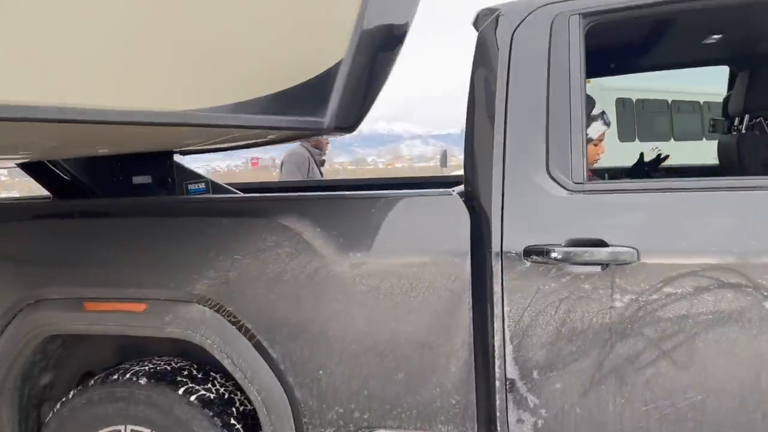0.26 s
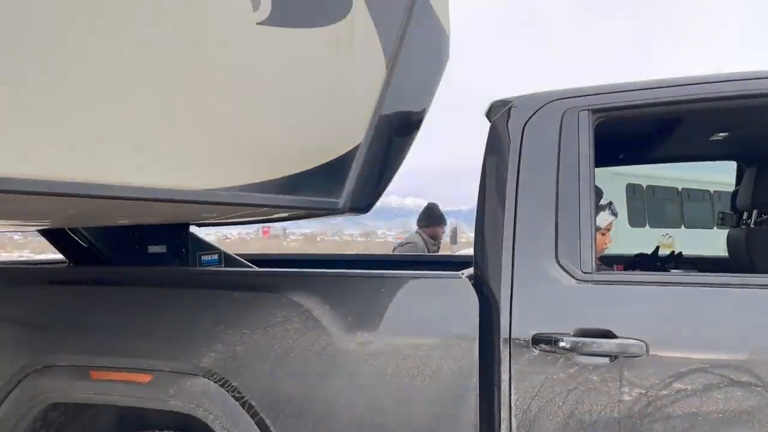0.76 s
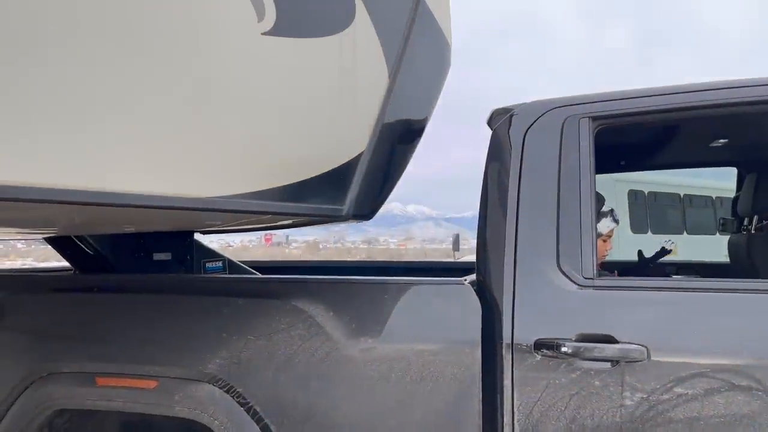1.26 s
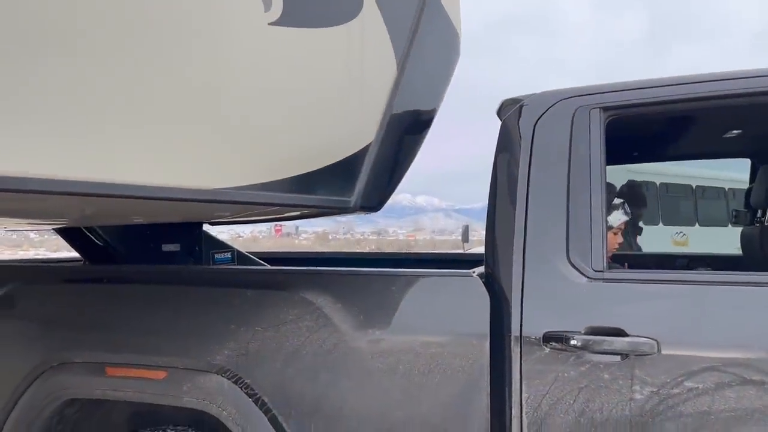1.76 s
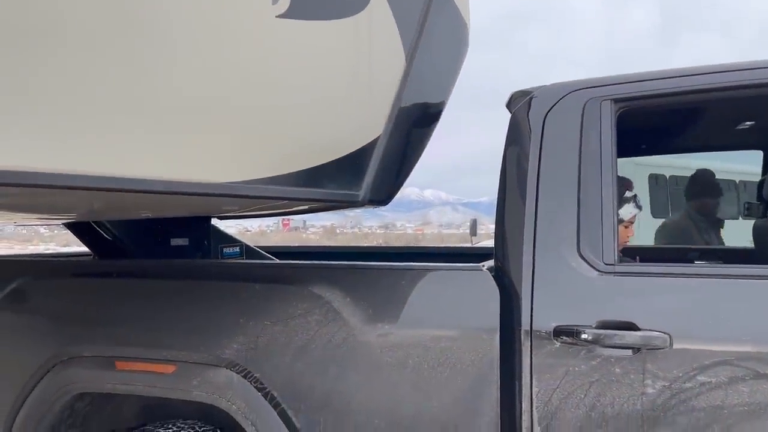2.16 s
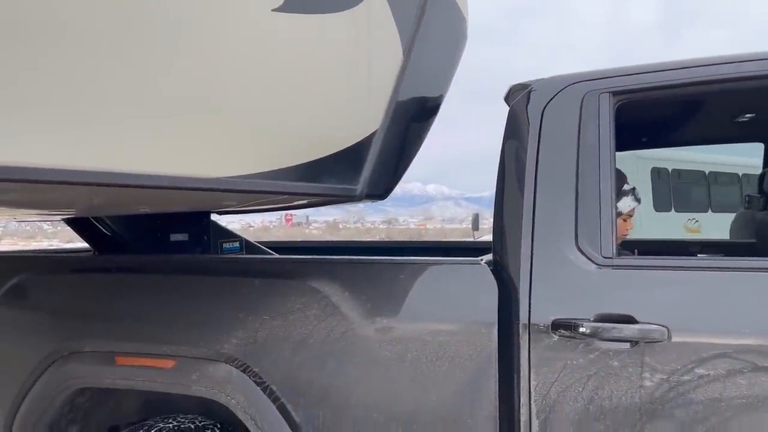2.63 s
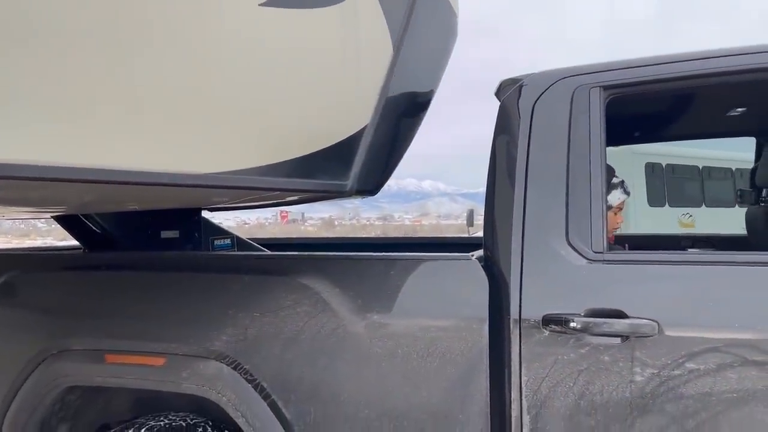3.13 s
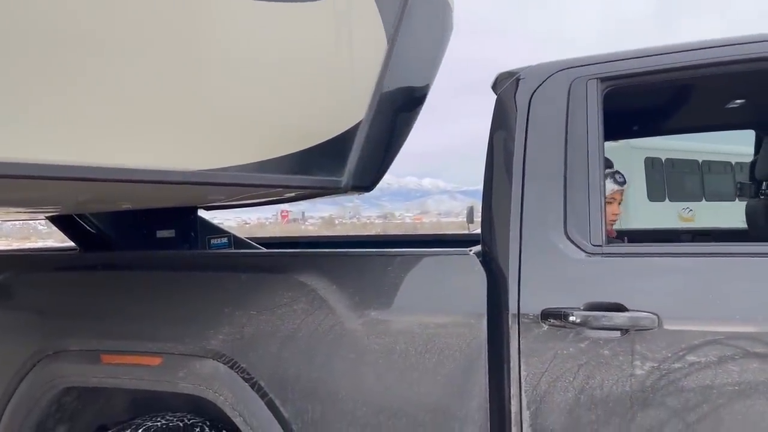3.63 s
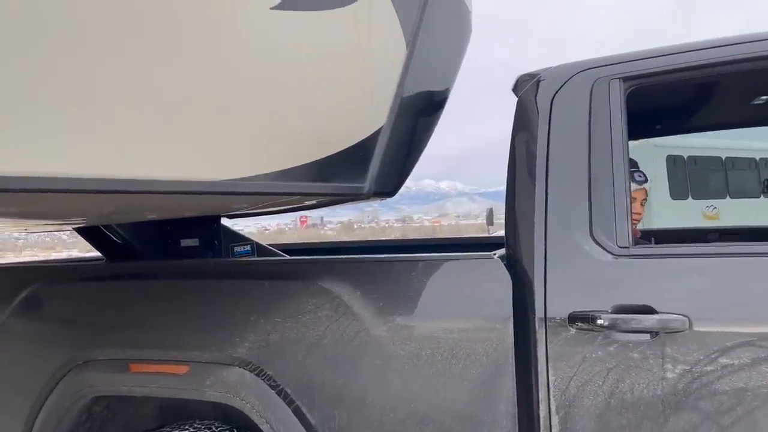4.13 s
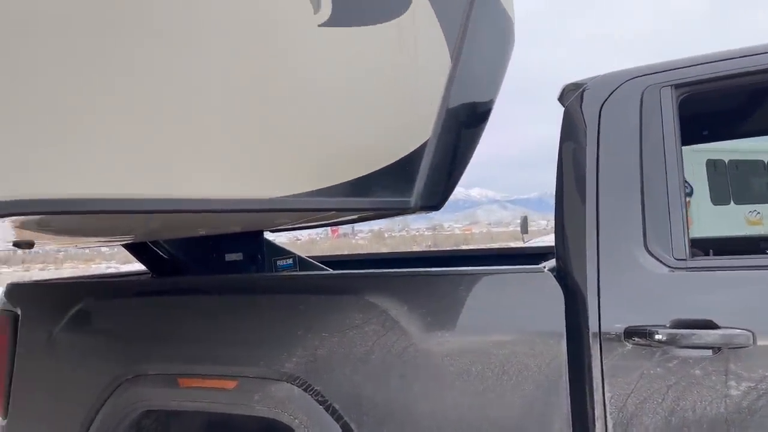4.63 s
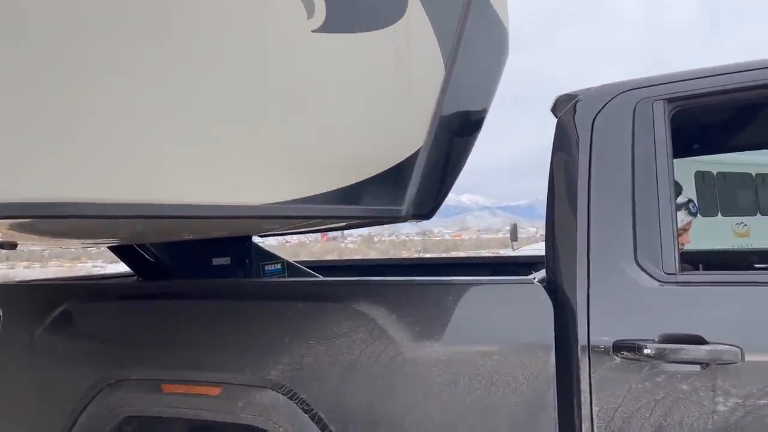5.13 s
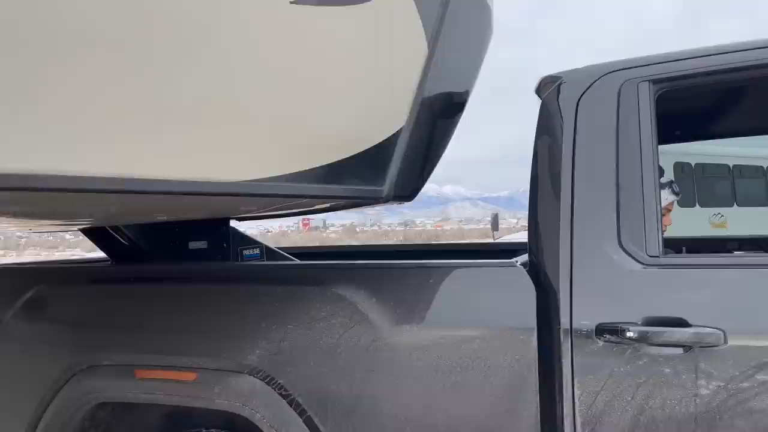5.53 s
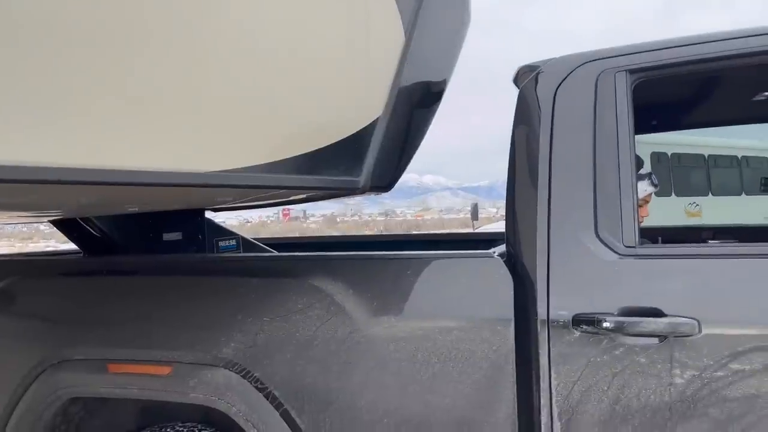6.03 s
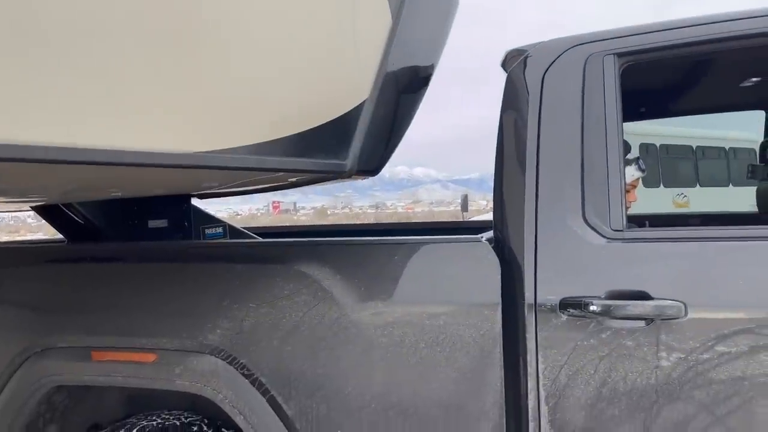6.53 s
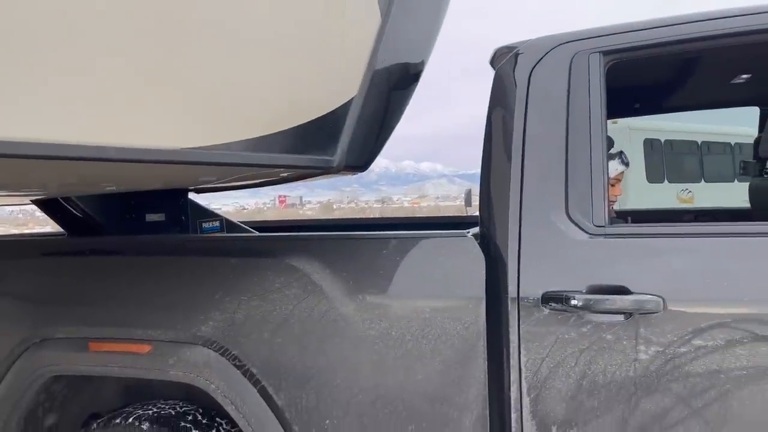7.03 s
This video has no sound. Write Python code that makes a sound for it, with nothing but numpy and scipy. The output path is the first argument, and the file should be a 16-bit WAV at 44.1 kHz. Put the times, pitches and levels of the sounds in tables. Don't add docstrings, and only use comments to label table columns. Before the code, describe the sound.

A close outdoor stereo pickup of a heavy diesel truck creeping slowly with a trailer. Throughout, a steady low exhaust drone pulses about forty times a second under dense, slightly loping injector clatter and metallic ticking; a faint airy turbo whistle sits above. The bed hums deep in uneven spells, with soft low body booms. Light knocks come from the hitch around 3.2 and 3.75 s. At 4.2 s a hard metallic clunk rings plate and panels, with a low thud and shudder; at 4.9 s comes the sharpest clank, and at 5.25 s a duller, heavier thump. A small bump follows at 5.6 s. Tyres scrub grit and dust faintly, most around 4 s. From about 6 s a heat shield buzz strengthens and engine speed dips slightly after 6.5 s. At 7.13 s a stone snaps in a quick bright crackle, and the engine still runs at the end, about 7.3 s.

```python
import sys
import numpy as np
from scipy import signal
from scipy.fft import rfft, irfft, next_fast_len
from scipy.io import wavfile
from scipy.ndimage import map_coordinates

SR = 44100
rng = np.random.default_rng(int(sys.argv[2]) if len(sys.argv) > 2 else 0)


def gain_from_db(level_db):
    decades = np.asarray(level_db, float) / 20
    return 10 ** decades


def wrap_up_sound(samples):
    columns = np.atleast_2d(samples).T
    tamed = np.clip(columns, -1, 1)
    steps = np.round(tamed * 32767).astype(np.int16)
    wavfile.write(sys.argv[1], SR, steps)


N = 321048
T = np.arange(N) / SR

# (time [s], firing rate [1/s])
FIRING_RATE = [(0, 39.96), (2, 39.95), (3, 39.93), (4, 40.0), (6.45, 39.97), (6.6, 39.1), (7.28, 38.9)]
# (multiple of the four-stroke cycle [-], level [dB rms])
EXHAUST_TONES = [(8, -48), (9, -61), (10, -60), (11, -55), (14, -56), (16, -56), (17, -62), (19, -49),
                 (21, -58), (22, -56), (24, -48), (25, -60), (26, -62), (40, -61), (77, -66), (80, -55.5),
                 (88, -68)]
# (place in cycle [0-1], pitch [Hz], peak [dB], t60 [s])
VALVE_THUMPS = [(.68, 253, -24, 0.04), (.765, 193, -27.5, 0.044), (0.96, 243, -28, 0.04),
                (0.4, 248, -39, 0.023)]
CYLINDER_KNOCK = [4, 1.5, 4, 2.9, 3.3, 4, -0.5, 3.8]
# (frequency [Hz], density [dB per Hz])
BAY_NOISE = [(250, -2.5), (500, -5), (700, -1.5), (1000, -0.5), (1400, 0), (2000, -7.5), (2700, -10.5),
             (3300, -13), (4200, -23.5), (7200, -34.5), (8100, -34), (9500, -28), (13800, -31.5),
             (14600, -26)]
# (frequency [Hz], width [Hz], lift [dB])
BLOCK_MODES = [(520, 70, -5), (820, 40, 4), (975, 45, 6), (1058, 35, 6), (1150, 50, -4), (1260, 40, 6),
               (1404, 40, 6), (1614, 50, 5.5), (1764, 60, 4), (1950, 55, 3), (2434, 75, 3), (2700, 120, 3),
               (3936, 70, 5), (5743, 60, 5)]
SMALL_PARTS = [823, 968, 1059, 1280, 1416, 1620, 1960, 2410, 2760, 3950, 4360, 4720, 5740]
# (start [s], end [s], pitch [Hz], level [dB rms])
BED_SPELLS = [(0, 0.505, 65.85, -44), (.5, 1.077, 65.2, -41), (1.35, 1.72, 63.5, -45),
              (1.78, 2.013, 65.95, -48), (2.025, 2.217, 67.8, -42), (2.28, 2.493, 68.3, -39),
              (2.627, 2.75, 62.9, -41.5), (2.81, 2.962, 62.7, -43.5), (3.095, 3.255, 60.4, -43.5),
              (3.312, 3.42, 62.6, -41.5), (3.53, 3.64, 64.3, -41), (3.73, 3.865, 61, -41),
              (3.95, 4.525, 60.67, -41.5), (4.595, 4.855, 63.7, -44), (5.45, 5.74, 60.6, -37.5),
              (5.79, 6.456, 60.7, -39.5), (6.519, 6.733, 61.3, -39), (6.78, 7.204, 63.7, -44)]
# (frequency [Hz], width [Hz], level [dB])
CAVITIES = [(46, 24, 2.5), (65, 45, -2.5), (105, 24, -4), (259, 76, -10.5), (423, 71, -19.5)]
# (middle [s], boom level [dB])
BODY_ROCKS = [(.3, -48.5), (1.4, -45.5), (1.95, -50), (3.3, -45.5), (4.7, -52), (5.28, -44.5), (6.26, -56),
              (7.18, -42)]

# (time [s], force [dB], sharpness added to small panels [dB], pitch factor of loaded big
# panels [-], weight that goes into the heaviest panels instead of the frame [dB])
HITCH_BLOWS = [
    (4.167, -19, 0, 0.92, -4.5),
    (4.884, -20, 2.5, 1.08, 1.5),
    (5.25, -26, -14, 0.967, 3.5),
]
# (pitch [Hz], peak over the force [dB], delay [s], swell time [s])
BED_PANELS = [(37.9, -9, 0.028, 0.066), (55.7, 5.5, 0.0369, 0.018), (103.3, 5, .012, .017),
              (210.7, 4.5, 0.0051, 0.0095), (288, -5, 0.00885, 0.0071), (952, 1.5, 0.0003, 0.005),
              (1183, -6, 0.00215, 0.0082), (1900, -17, 0.0028, 0.0125)]
# (frequency [Hz], width [Hz], level [dB])
PLATE_MODES = [(650, 190, -11), (972, 164, 5), (1247, 87, 5.5), (1464, 114, -0.5), (1920, 290, -6),
               (2670, 170, -15), (4000, 540, -27.5)]
# (frequency [Hz], density [dB per Hz])
FLOOR_THUD = [(60, -27), (150, 4), (300, 1), (600, -7.5), (1000, -3.5), (2500, -42)]
# (frequency [Hz], density [dB per Hz])
LOOSE_RATTLE = [(1500, 7.5), (3000, 4), (6000, -3), (13000, -24), (15000, -50)]
# (frequency [Hz], density [dB per Hz])
FRAME_SHUDDER = [(25, -32), (50, -3), (110, -0.5), (250, -11), (500, -32), (1500, -58)]
# (time [s], peak [dB], pitch [Hz], swell time [s])
SHORT_SWINGS = [(2.33, -51, 78, 0.038), (3.195, -27.5, 212, 0.0043), (3.305, -28.5, 70.5, 0.0045),
                (3.343, -44, 65, 0.0068), (3.749, -38, 198, 0.02), (3.809, -37.5, 214, 0.011),
                (4.167, -36.5, 4000, 0.0037), (4.169, -21, 330, 0.0081), (4.17, -20, 950, .011),
                (4.172, -37, 1984, 0.0085), (4.209, -20.5, 134, 0.013), (4.229, -21, 202, 0.0082),
                (4.36, -38, 105, 0.019), (4.411, -42, 57, 0.031), (4.886, -12.5, 1100, 0.0028),
                (4.884, -19.5, 1550, 0.0043), (4.954, -21.5, 84.7, 0.017), (5.2528, -27.5, 1147, 0.0059),
                (5.268, -30, 723, 0.0082), (5.271, -43, 548, .0061), (5.291, -28.5, 120, 0.029),
                (5.59, -33.5, 219, 0.0066), (7.135, -35, 280, 0.0075), (7.165, -28, 149, 0.0029),
                (7.2, -41, 37.8, .06)]

# (time [s], bright level [dB rms], dull level [dB rms], t60 [s])
STONE_SNAPS = [
    (7.133, -30.5, -25, 0.068),
    (7.136, -32, -29, 0.025),
    (7.141, -45, -37, 0.08),
    (7.147, -49, -27, 0.049),
    (7.159, -48, -32.5, 0.089),
]
# (frequency [Hz], level [dB])
STONE_COLOUR = [(2000, -4), (3200, 8), (4200, 6), (6300, 6.5), (8000, -11), (11000, -7), (14000, -15),
                (15200, -59)]
# (frequency [Hz], level [dB])
RUBBER_COLOUR = [(300, -11), (800, -2), (1500, 3), (2300, -7), (4000, -35)]

# (time [s], pitch [Hz], level [dB rms])
TURBO_WHISTLE = [(0, 4600, -62), (.3, 4610, -61.5), (.6, 4290, -58), (.9, 4080, -63.5), (1.6, 4000, -64),
                 (3, 3940, -61.5), (7.28, 3950, -67)]
# (time [s], level [dB rms])
SHIELD_BUZZ = [(0, -59), (5.5, -57), (6.3, -50.5), (7.05, -49.5), (7.28, -53)]
# (frequency [Hz], density [dB per Hz])
GRIT_COLOUR = [(1500, -32), (3500, -8.5), (5500, 1), (7500, -9.5), (15000, -31)]
# (frequency [Hz], density [dB per Hz])
DUST_COLOUR = [(4500, -28), (6200, 4), (9000, -6), (13500, -4), (15000, -40)]
# (middle [s], length [s], grit level [dB], dust level [dB])
TYRE_SCRUBS = [(.25, 0.67, -68, -70), (1.323, 0.74, -63, -63), (2.65, 0.66, -70, -76),
               (3.643, 0.42, -61, -59.5), (4.03, 0.39, -56.5, -57.5), (4.2, 0.39, -59, -70),
               (4.655, 1, -61, -73), (5.17, 0.45, -68, -64), (6.686, 0.36, -62, -68), (6.98, .45, -67, -64)]

# (frequency [Hz], likeness [0-1])
PORT_LIKENESS = [(60, .9995), (130, .98), (300, .88), (600, .68), (1200, .83), (2500, .5), (5000, .42),
                 (9000, .62), (11300, .92), (13000, .6)]
# (frequency [Hz], level [dB])
PORT_TILT = [(60, 2.5), (400, 0.5), (700, -3.5), (900, -2.5), (1400, 4.5), (2100, 6), (2600, -7.5),
             (4000, 4.5), (6000, 5.5), (7500, 1.5), (9500, -4), (11000, -0.5)]
# (frequency [Hz], phase [radians])
PORT_LEAD = [(0, 0), (300, -.5), (600, -1.5), (1640, -3.2), (2240, -5.8), (2930, -10.3), (3960, -12.6),
             (4570, -12.4), (5430, -15), (7800, -15.7), (10400, -18.85), (16000, -18.85)]


def engine():
    cycle = np.cumsum(track(FIRING_RATE)[0]) / SR / 8
    close = both(exhaust(cycle) + bed()) + clatter(cycle) + body_boom()
    return close + turbo() + both(shield(cycle)) + tyres()


def exhaust(cycle):
    out = np.zeros(N)
    for order, db in EXHAUST_TONES:
        size = np.sqrt(2) * gain_from_db(db + 1.5 * wobble(3))
        out += size * np.sin(2 * np.pi * (order * cycle + rng.random()))
    for place, hz, db, t60 in VALVE_THUMPS:
        turn, part = np.divmod(cycle + 1 - place, 1)
        t = part / 5
        scatter_db = rng.standard_normal(40)[turn.astype(int)]
        size = gain_from_db(db + scatter_db - 60 * t / t60)
        out += size * (1 - np.exp(-t / .005)) * np.sin(2 * np.pi * hz * t)
    return out


def clatter(cycle):
    db = -46 + 0.1627 * T
    firing, part = np.divmod(8 * cycle + .15, 1)
    firing = firing.astype(int)
    scatter_db = 1.3 * rng.standard_normal(firing[-1] + 1)[firing]
    size = gain_from_db(np.array(CYLINDER_KNOCK)[firing % 8] + scatter_db)
    pulse = size * part / 0.22 * np.exp(1 - part / 0.29)
    lope = gain_from_db(1.0 * np.cos(2 * np.pi * (cycle - .08)) + 0.86 * wobble(14))

    def colour(hz):
        ring = 1 + sum((gain_from_db(lift) - 1) / (1 + (2 * (hz - c) / w) ** 2) for c, w, lift in BLOCK_MODES)
        return gain_from_db(along(BAY_NOISE, hz)) * ring

    depth = lambda hz: along([(700, 0.38), (2000, 0.63), (7000, 1.0), (12000, 0.8)], hz)
    steady = filtered(rng.standard_normal((2, N)) * lope, colour)
    knocks = filtered(rng.standard_normal((2, N)) * pulse, lambda hz: colour(hz) * depth(hz))
    return gain_from_db(db + 6.0) * unit(steady + knocks) + gain_from_db(db - 7) * both(pings(cycle, count=1800))


def pings(cycle, count):
    ring_cycles, detune = 86, .025
    place, late, part, strength, pitch = rng.random((5, count, 1))
    slot = np.floor(place * 24 * cycle[-1]) + .35 * late
    start = np.searchsorted(24 * cycle, slot)
    hz = np.array(SMALL_PARTS)[(len(SMALL_PARTS) * part).astype(int)]
    hz = hz * (1 + detune * (2 * pitch - 1))
    step = np.arange(SR // 40)
    t = step / SR
    size = gain_from_db(-5 * np.log(strength + 0.024) - 60 * t * hz / ring_cycles) * (1500 / hz) ** 0.65
    rings = size * np.sin(2 * np.pi * hz * t)
    return unit(np.bincount((start + step).ravel(), rings.ravel(), N + len(step))[:N])


def bed():
    rest_db, edge_s = -63.5, 0.034
    start, end, hz, _ = np.transpose(BED_SPELLS)
    edge = lambda t: .5 + .5 * np.tanh(2 * t / edge_s)
    size = gain_from_db(rest_db) + sum(gain_from_db(db) * edge(T - a) * edge(b - T) for a, b, _, db in BED_SPELLS)
    glide_hz = np.interp(T, (start + end) / 2, hz)
    return np.sqrt(2) * size * np.sin(2 * np.pi * np.cumsum(glide_hz) / SR)


def body_boom():
    rocks = [(s, 0.38, db + 0.5) for s, db in BODY_ROCKS]
    return swells(-49.5, rocks) * hiss(peaks(CAVITIES))


def hitch():
    heavy_hz, slow_hz, treble_hz = 80, 150, 500
    slack = 4
    plate, floor = hiss(peaks(PLATE_MODES)), shaped(FLOOR_THUD)
    loose, frame = shaped(LOOSE_RATTLE), shaped(FRAME_SHUDDER)
    out = both(sum(swing(s, hz, db, swell) for s, db, hz, swell in SHORT_SWINGS))
    for s, force_db, sharp_db, tension, weight_db in HITCH_BLOWS:
        clank_db = force_db - 0.5 + 1.9 * sharp_db
        out += gain_from_db(clank_db) * plate * (fading(s, .002, .09) + .4 * fading(s, .004, .25))
        out += gain_from_db(force_db - 0.3) * floor * fading(s, .003, .28)
        out += gain_from_db(force_db - 12.5) * loose * fading(s, 0.011, 0.24)
        out += gain_from_db(force_db - 8.5 - weight_db) * frame * fading(s + 0.029, 0.009, 0.79)
        panels = np.zeros(N)
        for hz, db, delay, swell in BED_PANELS:
            peak_db = force_db + db
            if hz < slow_hz:
                peak_db += weight_db * (hz < heavy_hz)
                panels += swing(s + delay / tension ** slack, hz * tension, peak_db, swell)
            else:
                peak_db += sharp_db * (hz > treble_hz)
                panels += swing(s + delay, hz, peak_db, swell)
        out += both(panels)
    return out


def swing(start, hz, db, swell):
    t = np.maximum(T - start, 0)
    turns = hz * (t + .15 * swell * (1 - np.exp(-t / swell)))
    size = gain_from_db(db) * (t / swell * np.exp(1 - t / swell)) ** 1.5
    return -size * np.sin(2 * np.pi * turns)


def stone():
    bright, dull = shaped(STONE_COLOUR), shaped(RUBBER_COLOUR)
    out = np.zeros((2, N))
    for s, bright_db, dull_db, t60 in STONE_SNAPS:
        out += (gain_from_db(bright_db) * bright + gain_from_db(dull_db) * dull) * fading(s, 0.00032, t60)
    return out


def turbo():
    hz, db = track(TURBO_WHISTLE)
    slow = hiss(lambda f: 1 / (1 + (2 * f / 810) ** 2))
    return gain_from_db(db) * np.sqrt(2) * slow * np.sin(2 * np.pi * np.cumsum(hz) / SR)


def shield(cycle):
    shake = .6 + .4 * np.cos(2 * np.pi * (2 * cycle - .25))
    note = np.sin(2 * np.pi * np.cumsum(820 + 10 * wobble(25)) / SR)
    return 2 * gain_from_db(track(SHIELD_BUZZ)[0] + 3.5 * wobble(34)) * shake * note


def tyres():
    rolling_db = -68
    grit = unit(shaped(GRIT_COLOUR) * gain_from_db(0.65 * wobble(60) + 1.1 * wobble(19)))
    dust = unit(shaped(DUST_COLOUR) * gain_from_db(2.3 * wobble(44)))
    grit_gain = gain_from_db(1.5) * swells(rolling_db, [(s, length, db) for s, length, db, _ in TYRE_SCRUBS])
    dust_gain = swells(rolling_db, [(s, length, db) for s, length, _, db in TYRE_SCRUBS])
    return grit_gain * grit + dust_gain * dust


def both(x):
    t = np.arange(SR // 20) / SR
    echo = rng.standard_normal(len(t)) * gain_from_db(-60 * t / 0.05)
    return np.array([x, signal.fftconvolve(x, echo / np.linalg.norm(echo))[:N]])


def hiss(response):
    return unit(filtered(rng.standard_normal((2, N)), response))


def shaped(spectrum):
    return hiss(lambda hz: gain_from_db(along(spectrum, hz)))


def peaks(modes):
    def response(f):
        return sum((-1) ** k * gain_from_db(db) * 1j * f * w / (c * c - f * f + 1j * f * w)
                   for k, (c, w, db) in enumerate(modes))
    return response


def filtered(x, response):
    m = next_fast_len(N + 8192)
    return irfft(rfft(x, m) * response(np.fft.rfftfreq(m, 1 / SR)), m)[..., :N]


def fading(start, rise, t60):
    t = np.maximum(T - start, 0)
    return (1 - np.exp(-t / rise)) * gain_from_db(-60 * t / t60)


def swells(rest_db, rows):
    power = sum(gain_from_db(2 * db) * np.exp(-(3 * (T - s) / length) ** 2) for s, length, db in rows)
    return np.sqrt(gain_from_db(rest_db) ** 2 + power)


def track(rows):
    s, *cols = np.transpose(rows)
    return [np.interp(T, s, c) for c in cols]


def along(points, hz):
    f, v = np.transpose(points)
    return np.interp(np.log(hz + 1), np.log(f + 1), v)


def wobble(rate):
    return map_coordinates(rng.standard_normal(int(N * rate / SR) + 4), [T * rate])


def unit(x):
    return x / np.sqrt(np.mean(x ** 2) + 1e-20)


def scene():
    turn = lambda hz: np.arccos(np.clip(along(PORT_LIKENESS, hz), 0, 1)) / 2
    paths = engine() + hitch() + stone()
    mid, side = filtered(paths, lambda hz: np.array([np.cos(turn(hz)), np.sin(turn(hz))]))
    return np.array([mid + side, mid - side])


def roll_off(x):
    return signal.sosfilt(signal.butter(12, 15590, fs=SR, output="sos"), x)


def record(dry):
    def ports(hz):
        half = gain_from_db(along(PORT_TILT, hz) / 2) * np.exp(.5j * np.interp(hz, *np.transpose(PORT_LEAD)))
        cut = hz ** 4 / (hz ** 4 + 24. ** 4) / (1 + (hz / 14300) ** 60)
        return cut * np.array([half, 1 / half])

    return roll_off(filtered(dry, ports))


dry = scene()
out = record(dry)
wrap_up_sound(out)
```